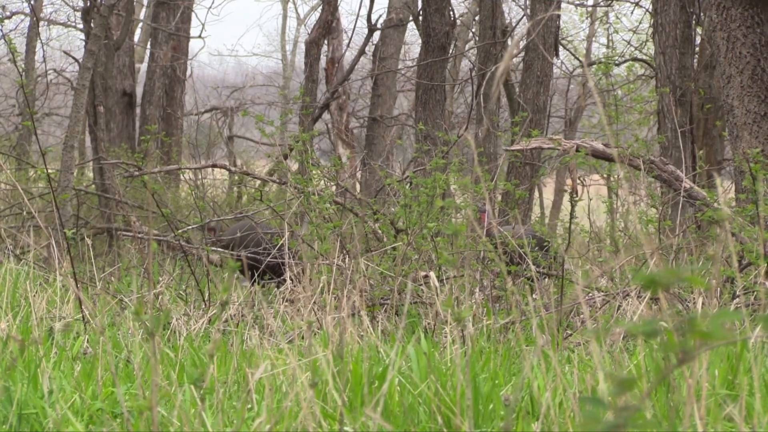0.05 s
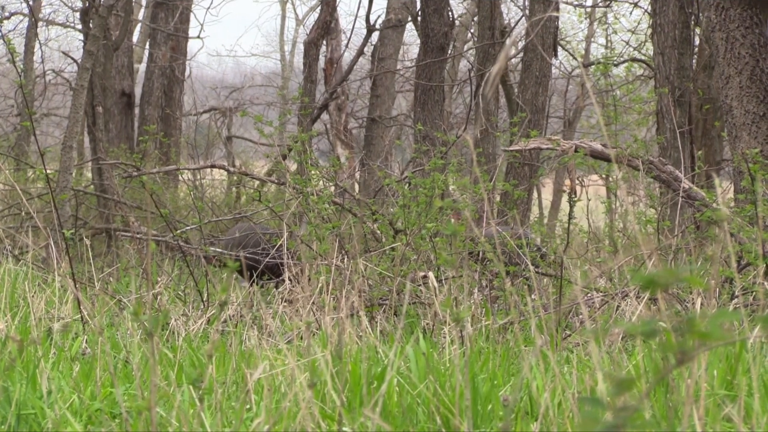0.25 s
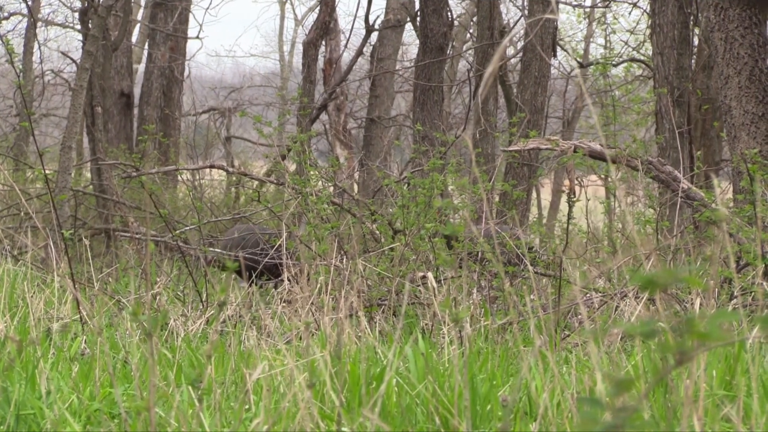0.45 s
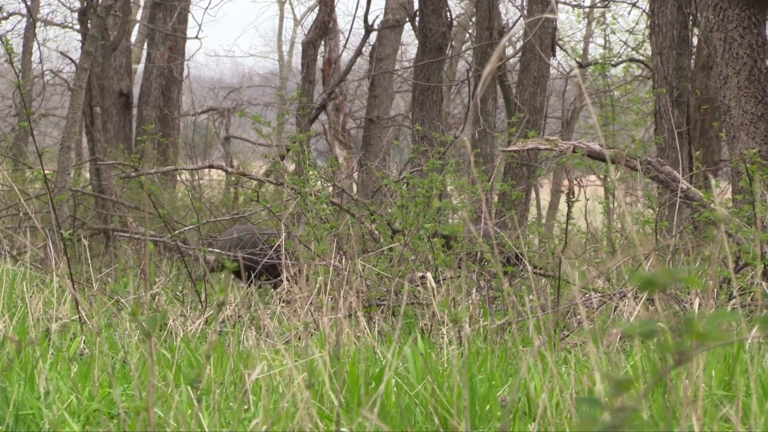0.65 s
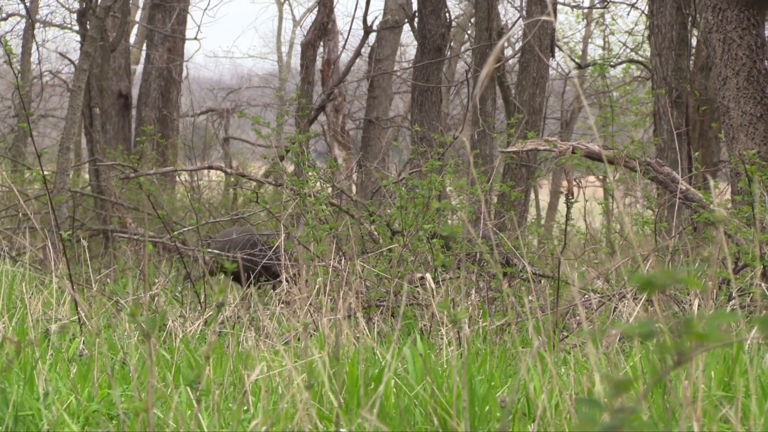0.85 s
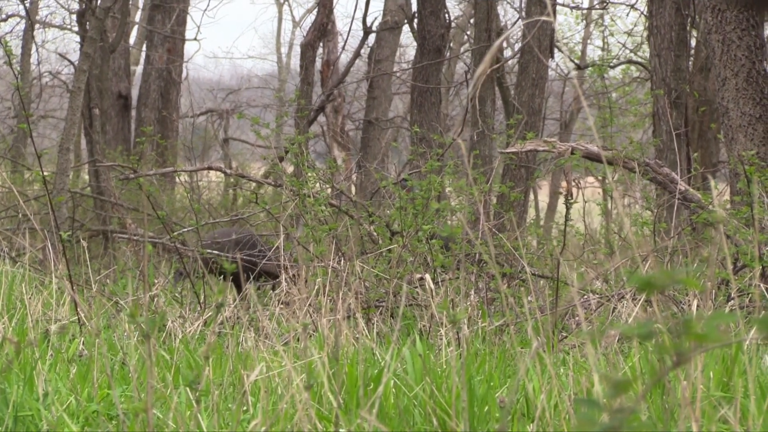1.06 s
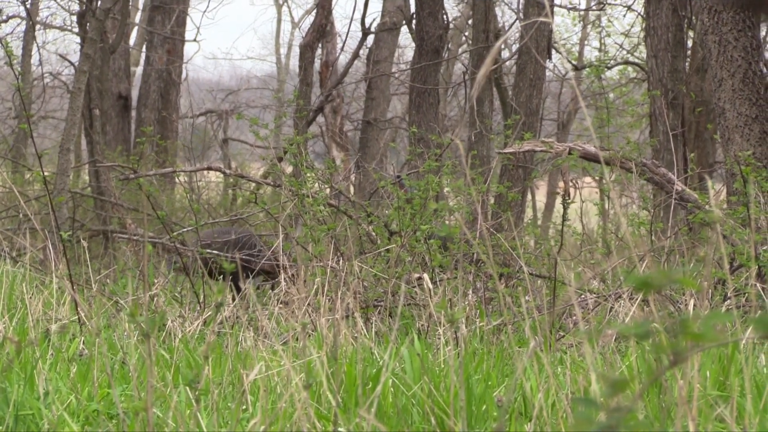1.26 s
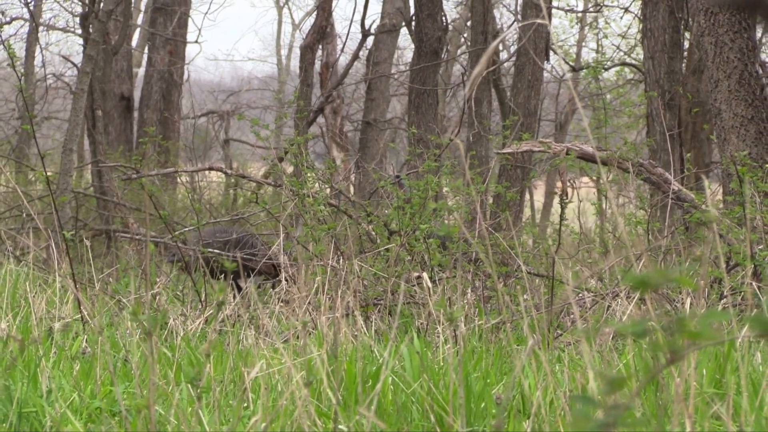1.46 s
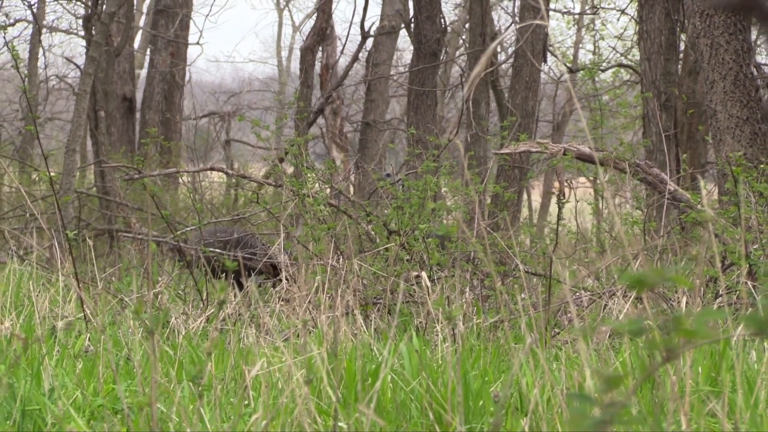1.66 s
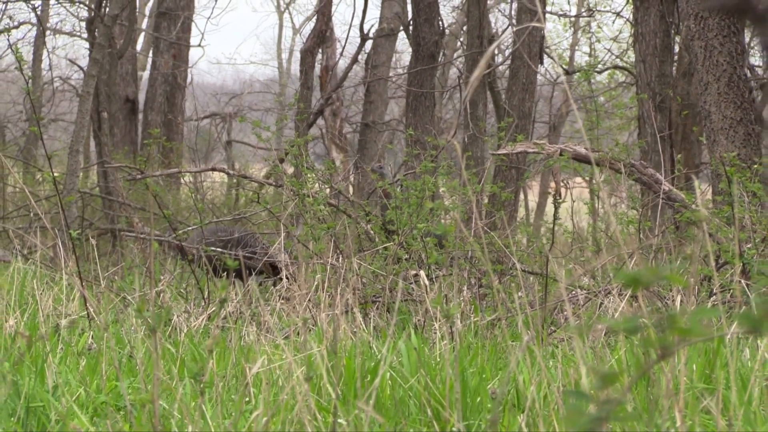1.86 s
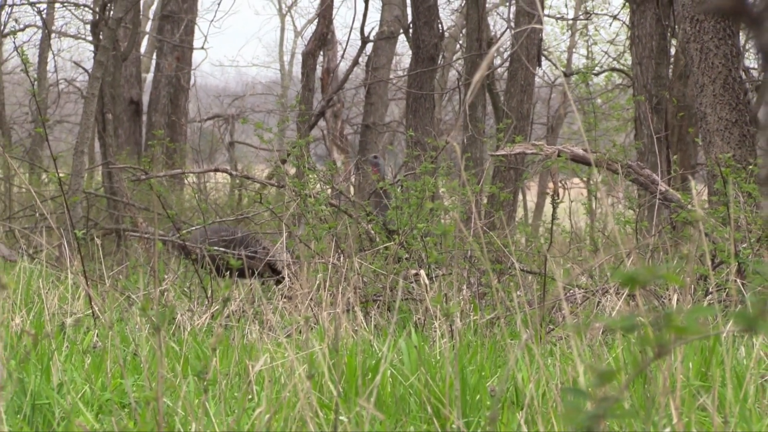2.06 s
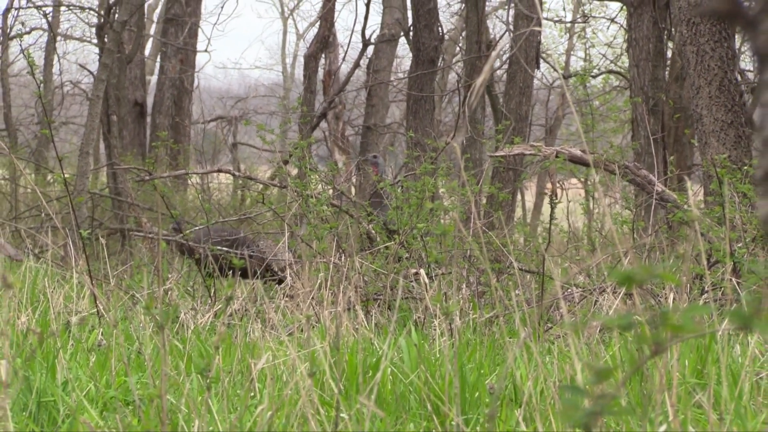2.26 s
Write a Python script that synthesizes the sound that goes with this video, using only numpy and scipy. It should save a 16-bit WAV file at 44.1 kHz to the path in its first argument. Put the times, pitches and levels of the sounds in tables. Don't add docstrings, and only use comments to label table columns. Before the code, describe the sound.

Five short turkey yelps, each breaking downward then snapping up, ring through woods above faint hiss.

```python
import sys
import numpy as np
from scipy import signal
from scipy.fft import rfft, irfft, next_fast_len
from scipy.io import wavfile
from scipy.ndimage import uniform_filter1d

SR = 44100
rng = np.random.default_rng(int(sys.argv[2]) if len(sys.argv) > 2 else 0)


def int16_out(signal):
    q = np.round(np.clip(np.atleast_2d(signal).T, -1, 1) * 32767)
    wavfile.write(sys.argv[1], SR, q.astype(np.int16))


def level_to_linear(level):
    exponent = np.asarray(level, float) / 20
    return 10 ** exponent


N = 101429
LEAD = SR // 2


def evened(x):
    return x / np.sqrt(np.mean(x ** 2) + 1e-20)


def read(points, hz, axis=1):
    columns = np.transpose(points)
    return np.interp(np.log(hz + 1), np.log(columns[0] + 1), columns[axis])


def add(mix, start_s, sound):
    part = mix[LEAD + round(start_s * SR):][:len(sound)]
    part += sound[:len(part)]


def hen():
    # time in seconds, effort in dB, pitch in Hz.
    whine_curves = [
        [(.195, -44, 830), (.206, -29, 872), (.212, -27, 835), (.218, -24.5, 745), (.225, -28, 735),
         (.236, -30, 775), (.243, -44, 790)],
        [(.548, -50, 812.4), (.560, -32.5, 852.5), (.570, -22, 778), (.580, -26.5, 738), (.588, -35, 782),
         (.606, -44, 720), (.615, -68, 750)],
        [(.925, -46.5, 860), (.938, -36, 861), (.947, -21, 781), (.955, -25, 730), (.964, -30, 745),
         (.974, -41, 790.6), (.992, -37.5, 750)],
        [(1.281, -49, 823.5), (1.300, -37.5, 893), (1.305, -31.5, 862), (1.311, -22, 755), (1.320, -26, 710),
         (1.329, -49, 759), (1.338, -38, 760)],
        [(1.632, -64, 848.7), (1.648, -26, 849.5), (1.657, -25.5, 783.3), (1.666, -26, 760), (1.674, -22, 737),
         (1.684, -43, 730), (1.696, -41, 850)],
    ]
    # middle in seconds, effort in dB, pitch in Hz, length in seconds.
    murmur_notes = [
        (0.265, -38, 664.6, 0.03),
        (0.618, -60, 652, 0.019),
        (0.989, -42, 620, 0.019),
        (1.336, -42, 602, 0.03),
        (1.705, -45, 623, 0.034),
    ]
    # peak in seconds, effort in dB, start pitch in Hz, end pitch in Hz,
    # length in seconds.
    flip_notes = [
        (0.288, -22.5, 781.3, 1004, 0.013),
        (.636, -26.5, 722.6, 860, 0.028),
        (1.014, -25.5, 718.4, 950, .017),
        (1.376, -26, 707, 917, 0.022),
        (1.7253, -23.5, 746, 927, .016),
    ]
    # middle in seconds, effort in dB, pitch in Hz, length in seconds.
    squeak_notes = [
        (0.294, -37, 1015, 0.015),
        (.651, -32.5, 906, 0.013),
        (1.023, -37, 932, .018),
        (1.390, -31, 894, .014),
        (1.735, -29, 938, .014),
    ]
    earlier_s, earlier_db = 1.785, 1
    tracks = np.zeros((len(flip_notes), N + LEAD))
    yelps = zip(tracks, whine_curves, murmur_notes, flip_notes, squeak_notes)
    for track, whine_curve, murmur_note, flip_note, squeak_note in yelps:
        add(track, *whine(whine_curve))
        add(track, *murmur(*murmur_note))
        add(track, *flip(*flip_note))
        add(track, *squeak(*squeak_note))
    earlier = level_to_linear(earlier_db) * np.roll(tracks[-1], -round(earlier_s * SR))
    return [*tracks, earlier]


def whine(curve):
    release_s, smooth_s = .003, .003
    s, db, hz = np.transpose(curve)
    t = np.arange(s[0] - release_s, s[-1] + release_s, 1 / SR)
    size = int(smooth_s * SR) + 1
    smooth_db = uniform_filter1d(np.interp(t, s, db), size)
    smooth_hz = uniform_filter1d(np.interp(t, s, hz), size)
    fade = np.clip(np.minimum(t - t[0], t[-1] - t) / release_s, 0, 1)
    return t[0], fade * voice(smooth_db, smooth_hz, rasp_db=-23)


def murmur(middle_s, db, hz, length_s):
    return steady_note(middle_s, db, hz, length_s, rasp_db=-9)


def flip(peak_s, db, start_hz, end_hz, length_s):
    curve, sharp, lean = 2.4, .9, 1.2
    clear_db, raspy_db = -23, -7
    u = np.arange(0, length_s, 1 / SR) / length_s
    rasp_db = clear_db + (raspy_db - clear_db) * u
    hz = start_hz + (end_hz - start_hz) * u ** curve
    swell = np.sin(np.pi * u ** lean) ** sharp
    return peak_s - length_s / 2, swell * voice(db, hz, rasp_db)


def squeak(middle_s, db, hz, length_s):
    return steady_note(middle_s, db, hz, length_s, rasp_db=-8)


def steady_note(middle_s, db, hz, length_s, rasp_db):
    u = np.arange(0, length_s, 1 / SR) / length_s
    return middle_s - length_s / 2, np.sin(np.pi * u) * voice(db, np.full(len(u), hz), rasp_db)


def voice(db, hz, rasp_db):
    jitter, voice_db = .006, 5
    bright, full_db, main_harmonic = .3, -25, 2
    wobble, rasp = rng.standard_normal((2, len(hz)))
    hz = hz * (1 + jitter * evened(uniform_filter1d(wobble, size=60)))
    turns = np.cumsum(hz) / SR
    k = np.arange(1, 9)[:, None]
    gains = throat(k * hz) * level_to_linear(bright * (db - full_db) * (k - main_harmonic))
    tone = (gains * np.exp(2j * np.pi * k * turns)).sum(0).real
    tone = tone / np.sqrt((abs(gains) ** 2).sum(0) / 2)
    shake = uniform_filter1d(uniform_filter1d(rasp, size=40), size=40)
    return level_to_linear(db + voice_db) * tone * (1 + level_to_linear(rasp_db) * evened(shake))


def throat(hz):
    # resonance in Hz, width in Hz, level in dB.
    resonances = [(860, 265, -21.5), (1566, 458, 1), (2220, 431, 3), (3263, 283, 0), (4020, 305, -11.5),
                  (4330, 330, -16)]
    gain = 0
    for i, (f, width, db) in enumerate(resonances):
        gain = gain + (-1) ** i * level_to_linear(db) / (1 + 2j * (hz - f) / width)
    return gain / (1 + (hz / 5060) ** 20)


def woods(x):
    # delay in seconds, level in dB.
    trunks = [
        (.0068, -16),
        (.0145, -15),
        (.0223, -9),
        (.029, -14),
        (.037, -16),
        (.0555, -16),
    ]
    # frequency in Hz, near t60 in seconds, far t60 in seconds, colour in dB.
    scatter = [(750, 0.9, 0.53, 2.5), (1230, 0.39, 1.1, -11.5), (1408, 0.39, 0.91, 3),
               (1670, 0.45, 1.25, -4.5), (2090, .2, 1.3, -1), (2230, 0.18, 0.91, -8),
               (3200, 0.3, 1.07, -10.5), (4620, .2, 0.86, -0.5)]
    near_db, far_db, onset_s = -9, -7, .0039
    hz, t, z = signal.stft(rng.standard_normal(SR * 3 // 2), SR, nperseg=256)

    def decay(t60):
        return level_to_linear(-60 * t / t60[:, None]) / np.sqrt(t60[:, None])

    near = level_to_linear(near_db) * decay(read(scatter, hz, axis=1))
    far = level_to_linear(far_db) * decay(read(scatter, hz, axis=2))
    tail = signal.istft(z * (near + far), SR, nperseg=256)[1] * np.sqrt(2 * np.log(1000) / SR)
    tail *= np.clip(np.arange(len(tail)) / SR / onset_s, 0, 1)
    for delay_s, db in trunks:
        tail[round(delay_s * SR)] += level_to_linear(db) * rng.uniform(.6, 1.2)
    size = next_fast_len(len(x) + len(tail))
    colour = level_to_linear(read(scatter, np.fft.rfftfreq(size, 1 / SR), axis=3))
    return irfft(rfft(x, size) * rfft(tail, size) * colour, size)[:len(x)]


def chirp():
    # middle in seconds, start pitch in Hz, end pitch in Hz, length in seconds, level in dB.
    whistle = (1.113, 7600, 6700, .05, -54)
    middle_s, start_hz, end_hz, length_s, db = whistle
    u = np.arange(0, length_s, 1 / SR) / length_s
    turns = np.cumsum(start_hz + (end_hz - start_hz) * u) / SR
    out = np.zeros(N + LEAD)
    add(out, middle_s - length_s / 2, level_to_linear(db) * np.sin(np.pi * u) * np.sin(2 * np.pi * turns))
    return out


def rumble():
    return air() + drones() + bump()


def air():
    # frequency in Hz, density in dB per Hz.
    air_colour = [(12, -34), (30, -8.5), (60, 2.5), (110, -0.5), (220, -11.5), (700, -17.5), (1800, -30),
                  (7000, -32)]
    # time in seconds, level in dB.
    gust_curve = [(0.0, -49.5), (0.36, -44.5), (0.38, -45), (0.84, -46.5), (1.02, -52), (1.1, -42.5),
                  (1.14, -39), (1.2, -47.5), (1.53, -47), (1.56, -62), (1.58, -43), (1.99, -55.5),
                  (2.01, -42.5), (2.17, -57), (2.19, -39.5), (2.3, -50)]
    air_db, patch_db = -40, 1.5
    gust_mean_db, gust_top_hz, air_top_hz = -48, 170, 5200
    frames = N // 512 + 9
    hz = np.fft.rfftfreq(2048, 1 / SR)[:, None]
    real, imaginary, patches = rng.standard_normal((3, 1025, frames))
    patches = evened(uniform_filter1d(uniform_filter1d(patches, size=6, axis=0), size=8, axis=1))
    frame_s = (np.arange(frames) - 2) * 512 / SR
    gust = np.interp(frame_s, *np.transpose(gust_curve)) - gust_mean_db
    low = 1 / (1 + (hz / gust_top_hz) ** 2)
    z = (real + 1j * imaginary) * level_to_linear(low * gust + read(air_colour, hz) + patch_db * patches)
    z = z / (1 + (hz / air_top_hz) ** 10)
    noise = signal.istft(z, nperseg=2048, noverlap=1536, boundary=False)[1]
    return level_to_linear(air_db) * evened(noise[2048:N + 2048])


def drones():
    # frequency in Hz, width in Hz, level in dB.
    drone_bands = [
        (88.15, 3, -49),
        (180.9, 3.4, -62),
        (1850, 630, -57),
    ]
    hz = np.fft.rfftfreq(N, 1 / SR)
    out = np.zeros(N)
    for f, width, db in drone_bands:
        band = rfft(rng.standard_normal(N)) / (1 + ((hz - f) / width * 2) ** 2)
        out += level_to_linear(db) * evened(irfft(band, N))
    return out


def bump():
    # middle in seconds, frequency in Hz, half length in seconds, level in dB.
    soft_bump = (1.098, 100, .018, -30)
    middle_s, f, half_s, db = soft_bump
    t = np.arange(N) / SR - middle_s
    return level_to_linear(db) * np.exp(-(t / half_s) ** 2) * np.sin(2 * np.pi * f * t)


def scene():
    birds = sum(yelp + woods(yelp) for yelp in hen()) + chirp()
    return np.array([birds[LEAD:] + rumble(), np.zeros(N)])


def band_limit(x):
    return signal.sosfilt(signal.butter(12, 16320, fs=SR, output="sos"), x)


def record(dry):
    # frequency in Hz, density in dB per Hz.
    hiss_colour = [(20, 13), (90, 8), (350, 3.5), (1000, 0.4), (2200, -2.5), (9000, -1.6), (16000, -2.5)]
    # level in dB, left then right.
    input_hiss_db = [
        [.6],
        [0],
    ]
    hiss_db, edge_hz = -51, 15770
    hz = np.fft.rfftfreq(N, 1 / SR)
    hiss_gain = level_to_linear(hiss_db + np.array(input_hiss_db) + read(hiss_colour, hz))
    hiss = rfft(rng.standard_normal((2, N))) * hiss_gain
    mix = irfft((rfft(dry) + hiss) * (hz < edge_hz), N)
    return band_limit(mix)


dry = scene()
out = record(dry)
int16_out(out)
```